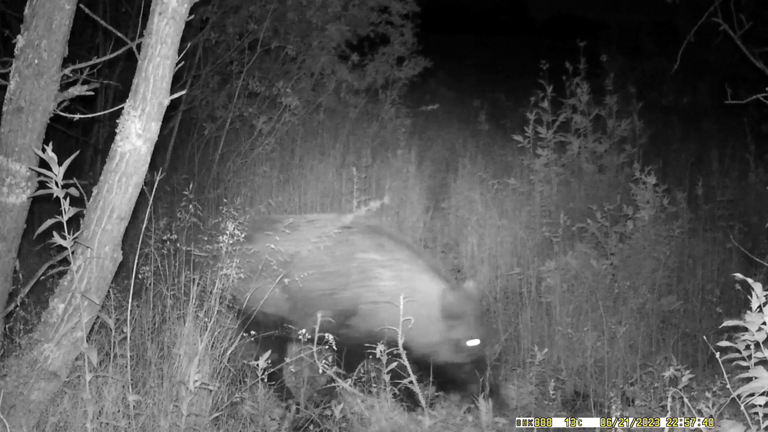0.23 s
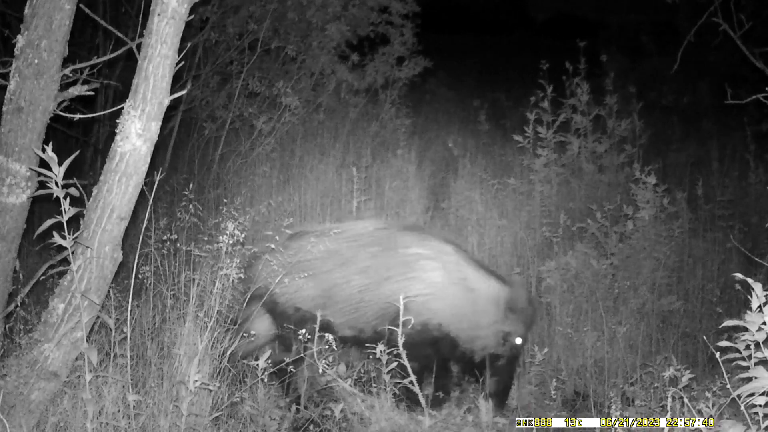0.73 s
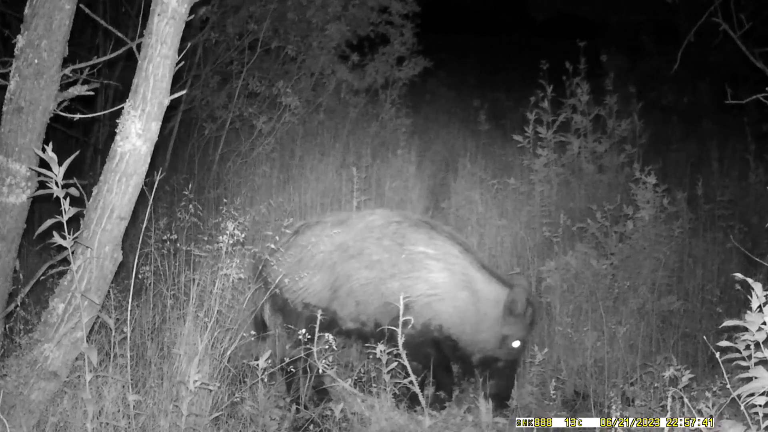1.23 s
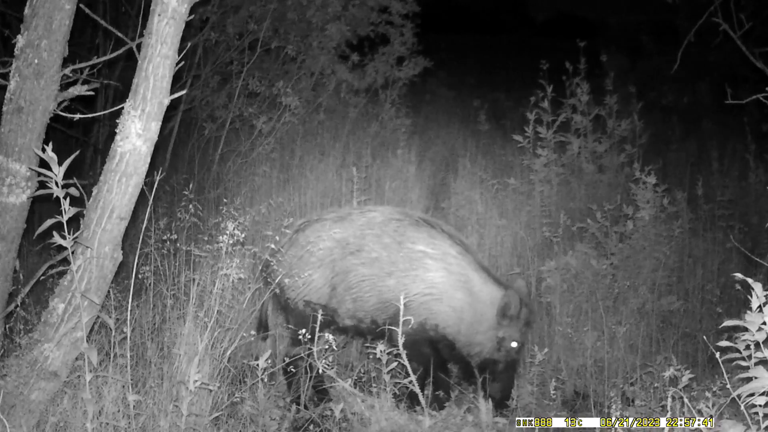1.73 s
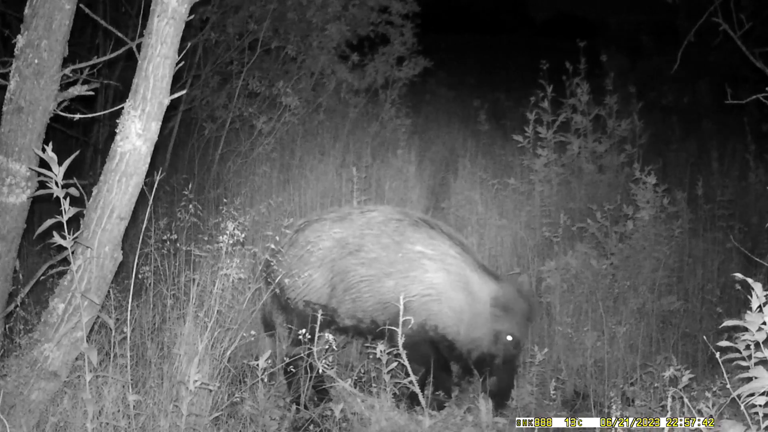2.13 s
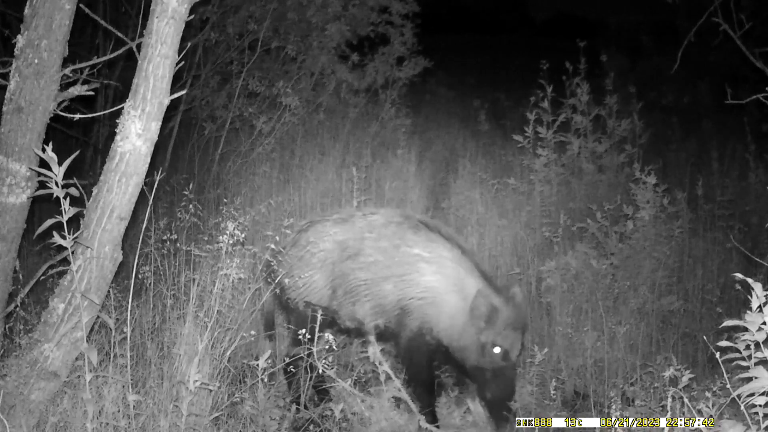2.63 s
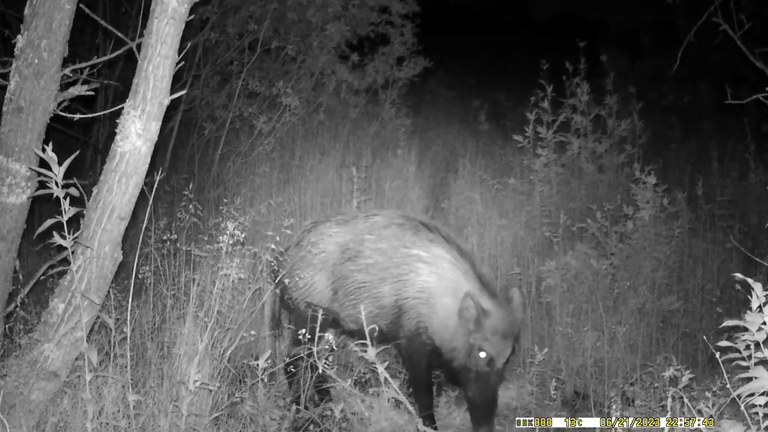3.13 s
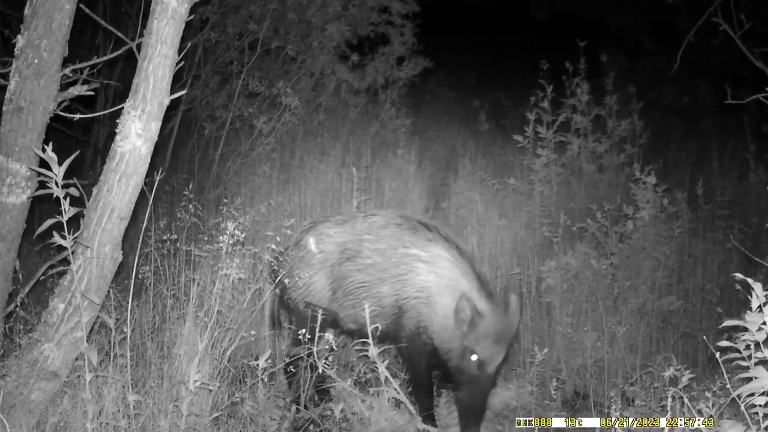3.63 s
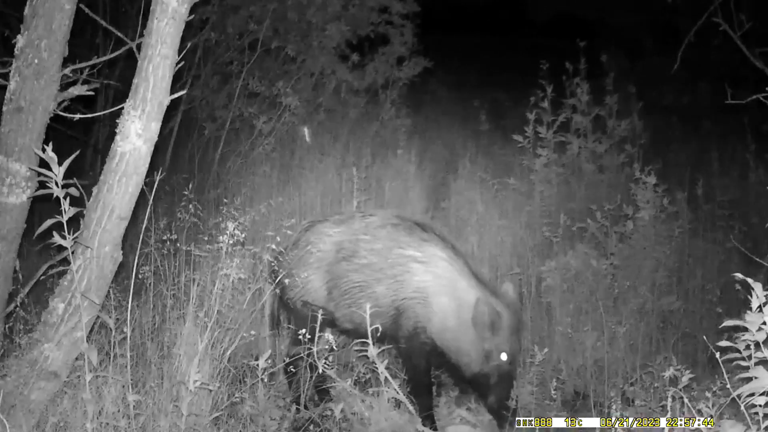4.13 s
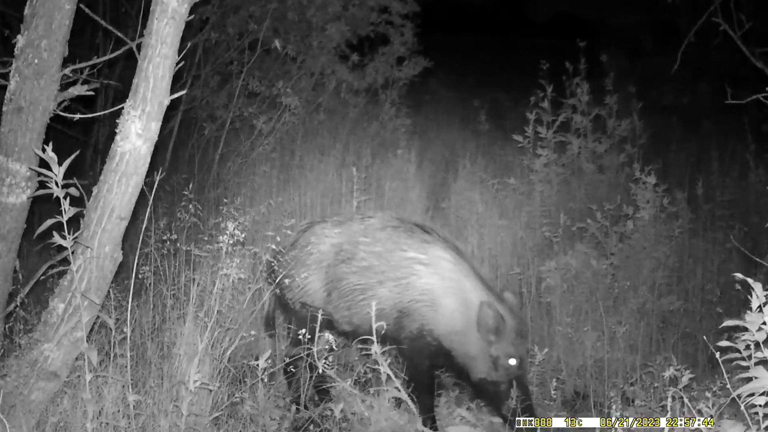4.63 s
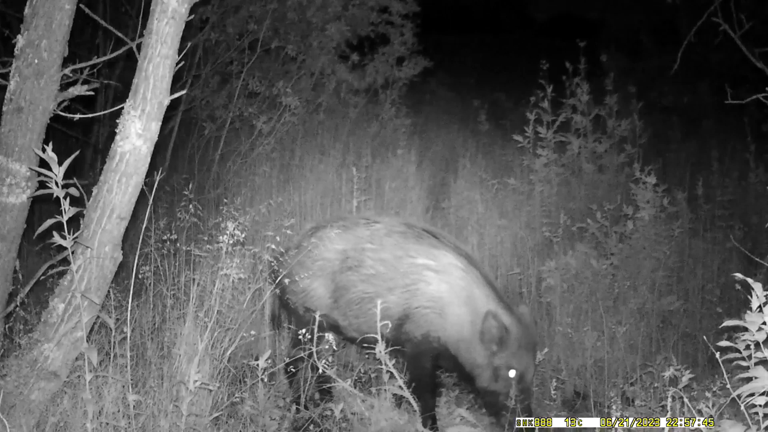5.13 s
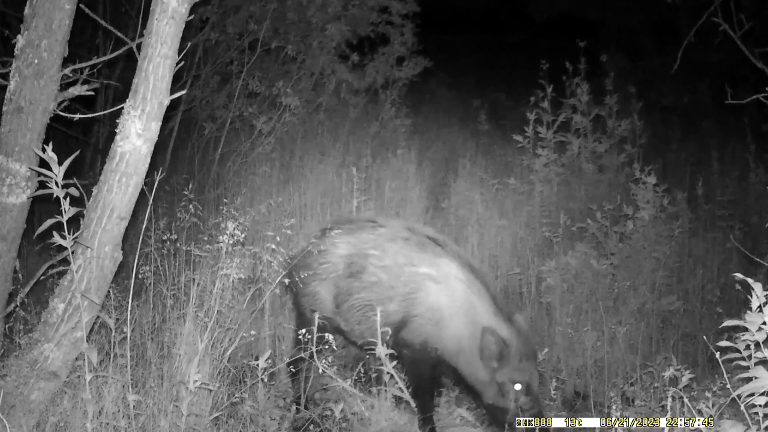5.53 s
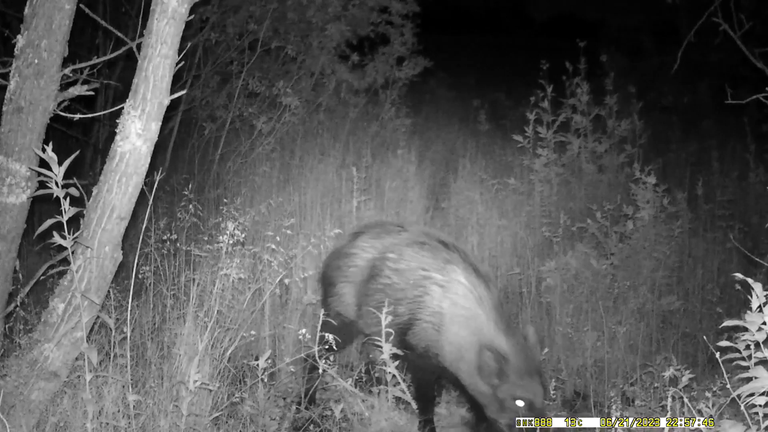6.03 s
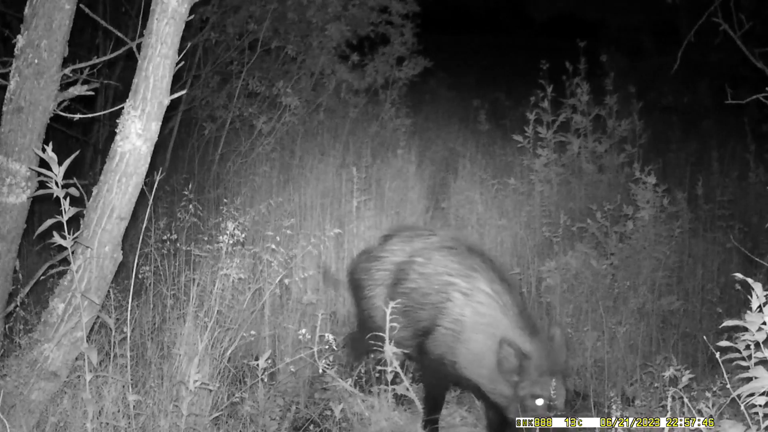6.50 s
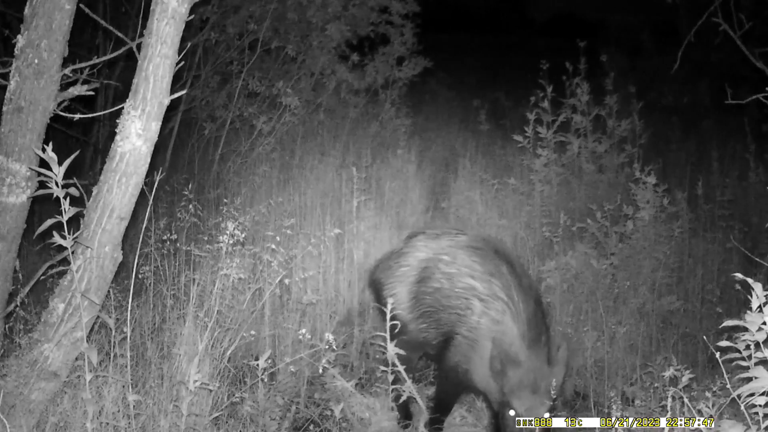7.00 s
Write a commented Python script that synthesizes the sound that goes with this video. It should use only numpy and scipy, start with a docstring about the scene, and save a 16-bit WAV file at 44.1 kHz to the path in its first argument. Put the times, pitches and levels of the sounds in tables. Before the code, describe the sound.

A boar pushes its snout through dry grass and soil, with muffled sniffs, breathy blows and wet mouth clicks. It grunts low and rattling twice, the second grunt opening into a nasal blow. Brittle twigs crack, most loudly late in the scene, and a hoof thuds dully. Steady faint insect chirps, a soft buzz and a low rumble lie behind. Outdoors at night, mono, a few metres away, with a short thin echo from stems.

```python
"""Wild boar rooting at night

A wild boar roots through dry grass, a few metres from a small microphone. Slack folds slapping in the
throat give two slow, rattling grunts; turbulent air in the nose snuffles at the ground. Filtered noise and
ticks make the grass, short ringing modes the twigs, torn clicks the wet smacks, arching partials the squeaks
and dull thuds the hooves. Insects chirp and buzz far off in the field, over still air and a low rumble."""
import sys
import numpy as np
from scipy import signal
from scipy.fft import rfft, irfft
from scipy.io import wavfile
from scipy.ndimage import uniform_filter1d

SR = 44100
rng = np.random.default_rng(int(sys.argv[2]) if len(sys.argv) > 2 else 0)


def unload_audio(sound):
    """Save the sound as a 16-bit wav file, at the path given as the first command line argument."""
    columns = np.transpose(np.atleast_2d(sound))
    # keep every value between -1 and 1, then stretch to whole-number steps
    steps = np.round(np.clip(columns, -1, 1) * 32767)
    wavfile.write(sys.argv[1], SR, steps.astype(np.int16))


N = 320166
T = np.arange(N) / SR   # time in seconds


def from_db(db):
    """Decibels to gain."""
    return 10 ** (np.asarray(db) / 20)


def rms_one(x):
    """Scale to unit power."""
    return x / np.sqrt(np.mean(x ** 2) + 1e-20)


def noise():
    """White noise."""
    return rng.standard_normal(N)


def drift(rate_hz):
    """Random wandering slower than a rate, with a spread of 1."""
    lowpass = signal.butter(2, rate_hz, fs=SR, output="sos")
    settled = signal.sosfilt(lowpass, rng.standard_normal(N + SR))[SR:]
    return rms_one(settled)


def level(rows):
    """Gain in time from rows of (s, dB), slightly smoothed; silent outside its rows."""
    s, db = np.transpose(rows)
    return uniform_filter1d(from_db(np.interp(T, s, db, left=-200, right=-200)), size=128)


def swells(rows, attack, release):
    """Gain in time from rows of (start s, length s, dB): each push builds up, holds and lets go."""
    power = np.zeros(N)
    for start, length, db in rows:
        on = (T > start) & (T < start + length)
        progress = (T[on] - start) / length
        shape = np.clip(np.minimum(progress / attack, (1 - progress) / release), 0, 1)
        power[on] += (from_db(db) * shape) ** 2
    return np.sqrt(power)


def at_hz(points, hz):
    """Read a spectrum in dB on a log-frequency axis."""
    f, db = np.transpose(points)
    return np.interp(np.log(hz + 1e-9), np.log(f), db)


def colour(x, points):
    """Filter by a spectrum whose skirts fall away beyond its ends."""
    f = np.linspace(1, SR / 2, N + 1)
    low_skirt = 1 / (1 + (points[0][0] / f / 2) ** 4)
    high_skirt = 1 / (1 + (f / points[-1][0] / 2) ** 4)
    return irfft(rfft(x, 2 * N) * from_db(at_hz(points, f)) * low_skirt * high_skirt)[:N]


def resonate(x, hz, width):
    """A resonance with gain 1 at its top."""
    r = np.exp(-np.pi * width / SR)
    zeros = np.array([1, 0, -1]) * (1 - r * r) / 2
    poles = [1, -2 * r * np.cos(2 * np.pi * hz / SR), r * r]
    return signal.lfilter(zeros, poles, x + 1e-18)


def airflow(modes):
    """Turbulence ringing in steep-sided resonances, each passed twice; unit power."""
    total = 0
    for hz, width, db in modes:
        once = resonate(noise(), hz, width)
        total = total + from_db(db) * resonate(once, hz, width)
    return rms_one(total)


def add(out, s, sound):
    """Mix a short sound in at time s."""
    i = max(0, int(s * SR))
    out[i:i + len(sound)] += sound[:max(0, N - i)]


# Strokes of snout, legs and flank through the grass.
# Each row: start in seconds, length in seconds, drive level in dB.
GRASS_STROKES = [(-0.039, 0.41, -47), (0.355, 0.6, -48.5), (0.689, 0.2, -45), (0.826, 0.38, -49),
                 (1.083, 0.19, -49.5), (1.381, 0.19, -50.5), (1.952, 0.72, -54.5), (2.55, 0.4, -53),
                 (2.88, 0.65, -47.5), (3.357, 0.29, -50), (3.703, 0.29, -39.5), (3.883, 0.29, -44),
                 (4.129, 0.45, -50), (4.376, 0.51, -49.5), (4.906, 0.48, -49.5), (5.215, 0.19, -42.5),
                 (5.348, 0.49, -45.5), (6.035, 0.22, -42.5), (6.157, 0.65, -49), (6.43, 0.453, -45.5),
                 (6.768, 0.67, -48), (7.091, 0.28, -41.5)]
# Colour of the dry blades. Each row: frequency in Hz, relative level in dB.
BLADE_COLOUR = [(900, -8.5), (1900, -7), (3000, -5.5), (4200, -3.5), (5600, 1), (7200, -4), (8800, -9),
                (11000, -15.5), (15500, -28.5)]
BRUSH_ATTACK, BRUSH_RELEASE = .18, .52   # shares of a stroke's length
FIDGET_DB = -55.5   # drive level: the grass never quite rests around the boar
CATCH_DB = .7   # spread of a stroke's unevenness


def grass(per_s=1500, clump_db=5, swish_db=-7.0, crackle_db=-6.5, catch_rate_hz=12):
    """Dry blades slide past the hide and tick against each other in clumps."""
    born = rng.random(N) < per_s * from_db(clump_db * drift(30)) / SR
    sizes = from_db(4.2 * np.minimum(rng.exponential(1, N), 4.5))
    ticks = born * sizes * rng.choice([-1, 1], N)
    crackle = from_db(crackle_db) * rms_one(colour(ticks, BLADE_COLOUR))
    swish = from_db(swish_db) * rms_one(colour(noise(), BLADE_COLOUR))
    strokes = swells(GRASS_STROKES, BRUSH_ATTACK, BRUSH_RELEASE)
    push = np.hypot(strokes, from_db(FIDGET_DB))
    # blades catch and slip, so no stroke is even
    return (crackle + swish) * push * from_db(CATCH_DB * drift(catch_rate_hz))


# Sniffs and blows, each one push of air through the nose. Each row: start in seconds, length in seconds,
# muffled murmur in dB, open blow in dB, both before the trims in snout().
NOSE_PUSHES = [(-0.008, 0.45, -45.5, -60), (0.633, 0.18, -60.9, -58.5), (0.93, 0.13, -51, -57),
               (1.052, 0.23, -41.5, -45.5), (1.24, 0.24, -45, -64), (1.833, 0.15, -53, -62),
               (1.942, 0.213, -46, -56), (2.118, 0.11, -48, -58.5), (2.26, 0.19, -55.8, -61.5),
               (2.59, 0.058, -56.5, -61), (2.971, 0.4, -50.5, -53), (3.37, 0.17, -55.5, -60),
               (3.474, 0.38, -53, -59.5), (3.845, 0.47, -44, -47.5), (4.194, 0.34, -43.5, -60),
               (4.38, 0.47, -53.5, -59.5), (4.838, 0.39, -48, -55.5), (5.07, 0.32, -47.5, -59),
               (5.38, 0.36, -45.5, -48), (6.241, 0.17, -50.5, -58.5), (6.35, 0.3, -55.5, -57.5),
               (6.547, 0.32, -46, -44.5), (6.889, 0.069, -60, -54.5), (7.077, 0.29, -53.5, -52)]
# Resonances of the nose pressed into the soil.
# Each row: frequency in Hz, width of a single pass in Hz, relative level in dB.
SOIL_NOSE = [(99, 144, -2), (213, 130, -3.5), (308.6, 112, 0), (375, 39, -8.5)]
# Resonances of the open nose. Each row: frequency in Hz, width of a single pass in Hz, relative level in dB.
OPEN_NOSE = [(411, 370, 2), (645, 244, 0.5), (878, 360, -3.5), (1200, 690, -6), (2670, 4500, -10.5)]
# A low purr in the throat, after the second grunt. Each row: time in seconds, level in dB.
THROAT_PURR = [(5.0, -57), (5.12, -66), (5.175, -54), (5.25, -48.5), (5.285, -66)]
SNIFF_ATTACK, SNIFF_RELEASE = .32, .46   # shares of a sniff's length


def snout(murmur_trim_db=-5.0, blow_trim_db=-1.0, flutter_db=2, purr_hz=120, purr_width_hz=60):
    """Turbulent air in the long nose, fluttering as the nostrils press on the soil."""
    start, length, murmur_db, blow_db = np.transpose(NOSE_PUSHES)
    murmur_gain = swells(zip(start, length, murmur_db + murmur_trim_db), SNIFF_ATTACK, SNIFF_RELEASE)
    blow_gain = swells(zip(start, length, blow_db + blow_trim_db), SNIFF_ATTACK, SNIFF_RELEASE)
    breath = murmur_gain * airflow(SOIL_NOSE) + blow_gain * airflow(OPEN_NOSE)
    purr = level(THROAT_PURR) * airflow([(purr_hz, purr_width_hz, 0)])
    return breath * from_db(flutter_db * drift(29)) + purr


# Colour of the still night air. Each row: frequency in Hz, relative level in dB.
AIR_COLOUR = [(15, -30), (25, 1.5), (113, -0.5), (410, -8), (722, -11.5), (1050, -8), (2060, -17),
              (4150, -12.5), (5580, -11), (6210, -19), (6730, -7), (8130, -18.5), (12500, -22),
              (14300, -27), (15500, -37)]
# Colour of the distant low rumble. Each row: frequency in Hz, relative level in dB.
RUMBLE_COLOUR = [(28, 0.5), (60, -2), (110, -3.5), (180, -7.5), (300, -10)]


def night_air(air_db=-59, rumble_db=-61.5):
    """Still air and a distant low rumble, both steady coloured noise."""
    air = from_db(air_db) * rms_one(colour(noise(), AIR_COLOUR))
    rumble = from_db(rumble_db) * rms_one(colour(noise(), RUMBLE_COLOUR))
    return air + rumble


def trill(hz=5500, width_hz=1100, db=-61, strokes_per_s=17.8):
    """A distant bush cricket buzzes in fast wing strokes: noise in one resonance, pulsing in level."""
    strokes = 1 + .6 * np.sin(2 * np.pi * strokes_per_s * T + drift(2))
    return from_db(db) * strokes * airflow([(hz, width_hz, 0)])


# Twigs and stalks breaking. Each row: time in seconds, before a short fixed delay,
# level in dB of the first break's peak, pitch in Hz, crack against ring in dB.
TWIG_BREAKS = [(0.037, -24.5, 5840, -6), (0.1423, -38, 5790, -6), (0.4604, -33, 6640, -10),
               (0.4843, -15, 5940, -6), (0.633, -32, 3600, -9), (0.836, -36, 6600, -5),
               (0.9483, -20, 4060, -4), (0.9616, -20, 5400, -1), (1.037, -32.5, 5200, -9),
               (1.3927, -38, 4440, -9), (1.4373, -29, 5070, 19), (2.0103, -31.5, 3120, -19),
               (2.8857, -35.5, 3340, -11), (2.89, -49, 3480, 4), (2.9003, -27, 5100, -20),
               (4.2697, -37, 2280, -22), (5.244, -19.5, 6830, -9), (5.4097, -28, 4300, -10),
               (6.0736, -40, 5130, -3), (6.109, -25, 6500, -8), (6.314, -40, 2680, -11),
               (6.4194, -0.5, 5580, -9), (6.5515, -36, 5640, -8), (6.8128, -12.5, 4090, -6),
               (6.995, -35, 6300, 5), (7.139, -35, 5500, -6), (7.203, -27, 3700, 5)]
# Modes of a breaking twig, before the thin-wood filter.
# Each row: multiple of its pitch, relative level in dB, time to fall 60 dB in seconds.
TWIG_MODES = [(.22, -27, 0.023), (.31, -23, 0.01), (.55, -9.5, .005), (.70, -6, 0.0027), (1, -2.5, 0.0042),
              (1.17, -5, 0.0033), (1.45, -10.5, 0.0044), (1.65, -7.5, 0.0032)]


def twigs(splinter_db=-24, weakness=.56, splinter_t60_s=.048, delay_s=.000949, crack_band_hz=(3400, 11000)):
    """A twig breaks with a bright crack and rings; fibres splinter after it."""
    out, t = np.zeros(N), T[:SR // 12]
    crack_band = signal.butter(2, crack_band_hz, "band", fs=SR, output="sos")
    crack = signal.sosfilt(crack_band, (t == 0).astype(float))
    crack = crack / np.abs(crack).max()
    thin_wood = signal.butter(2, 1400, "high", fs=SR, output="sos")
    for s, db, hz, crack_db in TWIG_BREAKS:
        ring = np.zeros(len(t))
        for i, (multiple, mode_db, t60) in enumerate(TWIG_MODES):
            decay = from_db(mode_db - 60 * t / t60)
            ring += (-1) ** i * decay * np.sin(2 * np.pi * hz * multiple * t)
        ring = signal.sosfilt(thin_wood, ring)
        snap = ring / np.abs(ring).max() + from_db(crack_db) * crack
        snap = snap / np.abs(snap).max()
        # weak stalks tear fibre by fibre, stout twigs go in one crack
        fibres = rng.standard_normal(len(t)) * (rng.random(len(t)) < .06)
        force = fibres * from_db(splinter_db - weakness * db - 60 * t / splinter_t60_s)
        force[0] = 1
        add(out, s + delay_s, from_db(db) * signal.fftconvolve(force, snap)[:len(t)])
    return out


def chirps(first_s, hz, db, width_hz=130, spread_s=.0083, period_s=.2263):
    """An insect repeats one short, narrow note, as steady as a clock."""
    from_note = (T - first_s + period_s / 2) % period_s - period_s / 2
    bell = np.exp(-(from_note / spread_s) ** 2 / 2)
    tone = signal.hilbert(resonate(noise(), hz, width_hz))
    return from_db(db) * bell * np.real(tone / np.abs(tone))   # the noise's own swelling is levelled out


# Wet smacks of the jaws. Each row: time in seconds, level in dB over its length before the trim in smacks(),
# mouth pitch in Hz as it starts to open, length in seconds, brightness in dB per octave.
JAW_SMACKS = [(0.177, -45.5, 1340, 0.018, 3), (0.26, -41, 1510, 0.014, 10.5),
              (0.489, -35, 1490, 0.0056, -1), (0.797, -37.5, 1330, 0.0091, -7),
              (1.3854, -46.5, 1800, 0.052, -23), (2.0368, -41, 1260, 0.011, -16),
              (2.608, -38.5, 1370, 0.022, 7), (2.7516, -30.5, 1320, 0.014, 7),
              (2.7576, -38.5, 1620, 0.011, 25), (3.353, -47.5, 1390, 0.039, -5),
              (3.4166, -37.5, 1390, 0.015, 12), (3.9554, -35.5, 1200, 0.014, 5),
              (4.171, -37.5, 1030, 0.0094, 13), (4.5485, -40, 1920, 0.0076, -3),
              (4.607, -33, 1640, 0.011, -10), (4.6144, -31, 1270, 0.011, 13),
              (5.243, -30.5, 1270, 0.0087, 11.5), (5.311, -44.5, 1190, 0.013, -11),
              (5.4086, -44, 1920, 0.008, -4), (5.5224, -22.5, 1400, 0.0069, -6.5),
              (5.9044, -42, 1620, 0.022, -4), (6.071, -40, 1016, 0.0093, 8), (6.314, -44, 1880, 0.005, -5)]
# Resonances of the mouth cavity before it opens.
# Each row: multiple of the mouth pitch, width in Hz, relative level in dB.
MOUTH_MODES = [(.63, 134, -5), (.93, 198, 4.5), (1.2, 231, -3.5), (1.6, 326, -7.5), (2.6, 400, -19),
               (3.6, 705, -21)]


def smacks(trim_db=-8, rise_per_s=6, attack_s=.001028, tears_per_s=6000, tear_size_db=4):
    """Wet lips tear apart in uneven clicks that ring the mouth, whose pitch rises as it opens."""
    out, t = np.zeros(N), T[:SR // 12]
    small_opening = signal.butter(2, [800, 7000], "band", fs=SR, output="sos")
    for s, db, hz, length, bright_db in JAW_SMACKS:
        length = max(length, .002)
        sizes = rng.standard_normal(len(t)) * from_db(tear_size_db * rng.standard_normal(len(t)))
        tears = sizes * (rng.random(len(t)) < tears_per_s / SR)
        tears = tears * (1 - np.exp(-t / attack_s)) * np.exp(-2 * t / length)
        smack = np.zeros(len(t))
        for i, (multiple, width, mode_db) in enumerate(MOUTH_MODES):
            gain = from_db(mode_db + bright_db * np.log2(multiple))
            smack += (-1) ** i * gain * resonate(tears, hz * multiple, width)
        # reading ever faster raises the pitch
        smack = np.interp(t * (1 + rise_per_s * t / 2), t, smack, right=0)
        smack = signal.sosfilt(small_opening, smack)
        strength = np.sqrt(np.sum(smack ** 2) / (length * SR) + 1e-20)
        add(out, s - attack_s, from_db(db + trim_db) * smack / strength)
    return out


# The two grunts. Each row: first closure in seconds, end in seconds, cycles per second, rasp in dB,
# dulling of the highest resonances as the mouth closes in dB per second.
GRUNT_CYCLES = [(.4495, .66, 25.7, -12, 30), (3.7405, 3.93, 25.4, -6, 65)]
# Effort, one list for each grunt. Each row: time in seconds, level in dB before the lift in grunts().
GRUNT_EFFORT = [
    [(0.44, -48), (0.454, -46.5), (0.522, -41.5), (0.658, -44.5), (0.675, -41)],
    [(3.73, -63), (3.786, -43), (3.856, -41), (3.95, -54)],
]
# Slaps of the slack folds within one cycle. Each row: share of the cycle before closure, strength in dB.
FOLD_SLAPS = [(0, -7), (0.154, -14.5), (0.421, -12.5)]
# Throat and chest resonances. Each row: frequency in Hz, width in Hz, level in dB before the mouth dulls it.
THROAT_MODES = [(53.7, 28, 3), (144.8, 22, 4.5), (216, 49, -9.5), (345, 170, -16.5), (515, 100, -15)]
# The nose rings as the second grunt opens into a blow.
# Each row: time in seconds, level in dB before the throb and the lift in grunts().
NOSE_RING = [(3.77, -66), (3.783, -51.5), (3.825, -54.5), (3.87, -64), (3.89, -45), (3.935, -58),
             (3.96, -53), (3.98, -83)]


def grunts(lift_db=4.0, nasal_hz=1200, nasal_width_hz=240, top_hz=600, jitter_s=.0005, shimmer_db=1):
    """Slack folds slap and ring the throat; air rasps in pulses, strongest around each main closure."""
    out = np.zeros(N)
    for (start, end, rate, rasp_db, dulling), effort in zip(GRUNT_CYCLES, GRUNT_EFFORT):
        pulses = np.zeros(N)
        for closure in np.arange(start, end, 1 / rate):
            for early, db in FOLD_SLAPS:
                late, force = rng.standard_normal(2)
                lateness = jitter_s * late * (.5 + 2 * early)   # earlier slaps are less regular
                add(pulses, closure - early / rate + lateness, from_db([db + shimmer_db * force]))
        gate = (.5 + .5 * np.cos(2 * np.pi * rate * (T - start))) ** 2
        rasp = from_db(rasp_db) * (.15 + gate) * noise() * np.sqrt(rate / SR) * 2
        closed_db = dulling * np.clip(T - start, 0, end - start)
        voice = np.zeros(N)
        for hz, width, db in THROAT_MODES:
            # rasp and mouth act most on the upper resonances
            upper = min(hz / top_hz, 1)
            ring = resonate(2 * upper * rasp - pulses, hz, width)
            # soft tissue damps everything above each resonance
            ring = signal.sosfilt(signal.butter(1, 2 * hz, fs=SR, output="sos"), ring)
            voice += from_db(db - upper * closed_db) * ring
        voice = signal.sosfilt(signal.butter(8, top_hz, fs=SR, output="sos"), voice)
        strength = np.std(voice[int(start * SR):int(end * SR)])
        out += voice / strength * level(effort)
    # the nose throbs a little after each closure of the last grunt
    throb = .45 + .75 * np.roll(gate, int(.007 * SR))
    nose = level(NOSE_RING) * airflow([(nasal_hz, nasal_width_hz, 0)]) * throb
    return from_db(lift_db) * (out + nose)


# Hooves on soft soil. Each row: time in seconds, peak level in dB.
HOOF_STEPS = [(1.324, -46), (6.074, -33.5)]


def hooves(hz=140, width_hz=110, decay_s=.011):
    """Soil crumbles under a hoof with a dull thud: a dying burst of noise in one low resonance."""
    out, t = np.zeros(N), T[:SR // 8]
    for s, db in HOOF_STEPS:
        crumble = rng.standard_normal(len(t)) * np.exp(-t / decay_s)
        thud = resonate(crumble, hz, width_hz)
        add(out, s, from_db(db) * thud / np.abs(thud).max())
    return out


# Squeaks of sucking at wet roots. Each row: start in seconds, length in seconds, first pitch in Hz,
# pitch at the top of the arch in Hz, lengths needed to reach the top, level in dB before the trim in squeaks(),
# fade over its length in dB, hoarseness from 0 to 1, brightness in dB per octave.
ROOT_SQUEAKS = [(1.61, .072, 1170, 2150, 1.6, -59, 0, .02, -3),
                (3.47, .075, 830, 1350, 1.1, -62, 4, .3, -5), (4.43, .135, 720, 1070, .52, -51, 10, .5, 7)]
# Colour of the squeaks. Each row: frequency in Hz, relative level in dB.
SQUEAK_SPECTRUM = [(700, 6), (1200, 2.5), (1700, -9), (2400, 3), (3600, -1), (4400, -2), (7000, -17)]
SQUEAK_ATTACK, SQUEAK_RELEASE = .1, .2   # shares of a squeak's length
SQUEAK_WAVER = .06   # spread of the pitch wobble when fully hoarse, as a share


def squeaks(trim_db=-1, rough_db=6):
    """Air drawn through a wet gap whistles in partials that arch up as it narrows, blurred when hoarse."""
    out, wobble, flutter_db = np.zeros(N), SQUEAK_WAVER * drift(570), rough_db * drift(130)
    for start, length, first_hz, top_hz, rising, db, fade_db, hoarse, bright_db in ROOT_SQUEAKS:
        on = (T > start) & (T < start + length)
        progress = (T[on] - start) / length
        arch = np.sin(np.pi / 2 * progress / rising)
        pitch = first_hz * (top_hz / first_hz) ** arch * (1 + hoarse * wobble[on])
        phase = 2 * np.pi * np.cumsum(pitch) / SR
        tone = np.zeros(len(pitch))
        for k in range(1, 5):
            partial_db = at_hz(SQUEAK_SPECTRUM, k * pitch) + bright_db * np.log2(k)
            tone += from_db(partial_db) * np.sin(k * phase)
        swell = swells([(start, length, db + trim_db)], SQUEAK_ATTACK, SQUEAK_RELEASE)[on]
        out[on] += swell * from_db(hoarse * flutter_db[on] + fade_db * (.5 - progress)) * rms_one(tone)
    return out


def thicket(x, wet_db=-11, t60_s=.22, low_hz=500):
    """Stems and trunks scatter a short, thin tail of the higher pitches."""
    t = T[:SR // 2]
    echoes = rng.standard_normal(len(t)) * from_db(-60 * t / t60_s) * (t > .002)
    echoes = signal.sosfilt(signal.butter(1, low_hz, "high", fs=SR, output="sos"), echoes)
    echoes = echoes / np.linalg.norm(echoes)
    return x + from_db(wet_db) * signal.fftconvolve(x, echoes)[:N]


def scene():
    """The boar among the stems, a few metres off, over far insects and still air."""
    boar = snout() + twigs() + smacks() + grunts() + hooves() + squeaks()
    insects = trill() + chirps(first_s=.167, hz=7370, db=-60) + chirps(first_s=.23, hz=6660, db=-50.5)
    return (grass() + thicket(boar) + insects + night_air())[None]


def record(dry, cutoff_hz=15850):
    """The top is cut steeply by a tenth-order elliptic low-pass."""
    return signal.sosfilt(signal.ellip(10, .1, 80, cutoff_hz, fs=SR, output="sos"), dry)


dry = scene()
out = record(dry)
unload_audio(out)
```